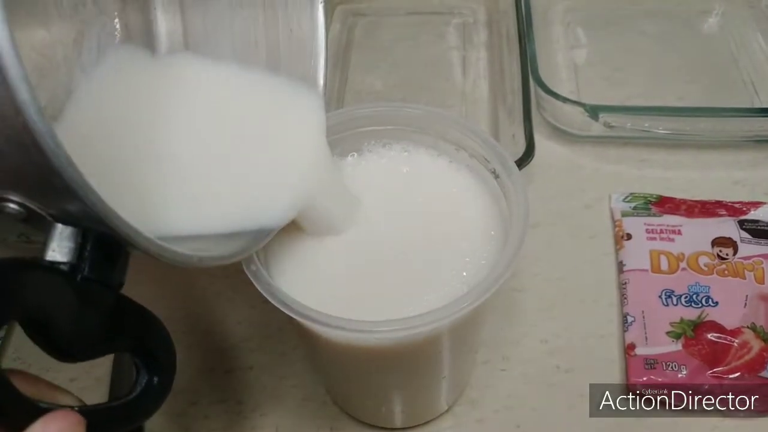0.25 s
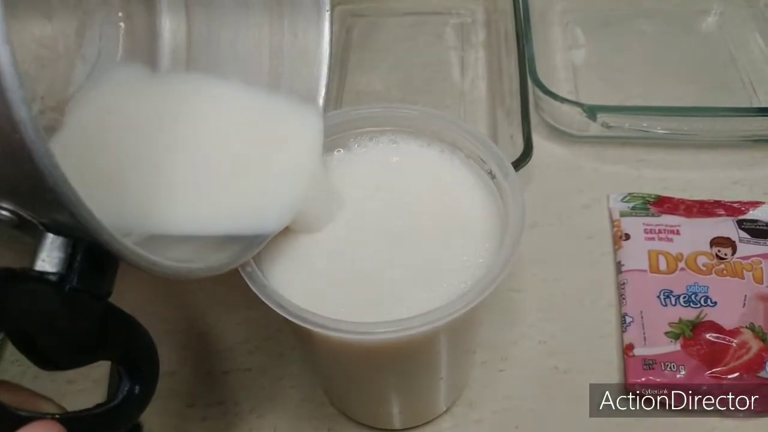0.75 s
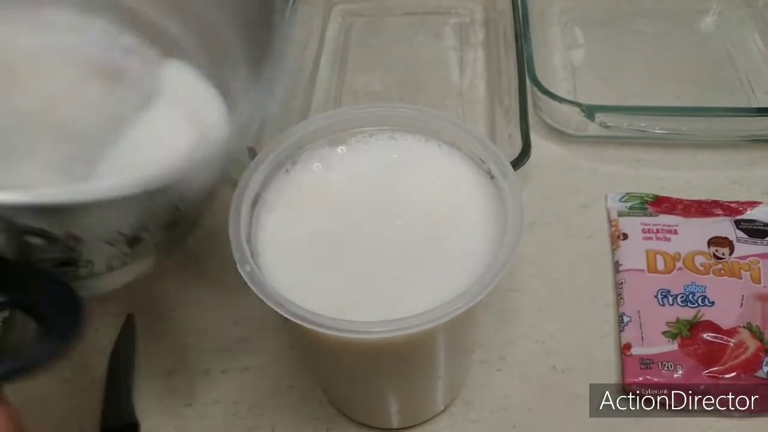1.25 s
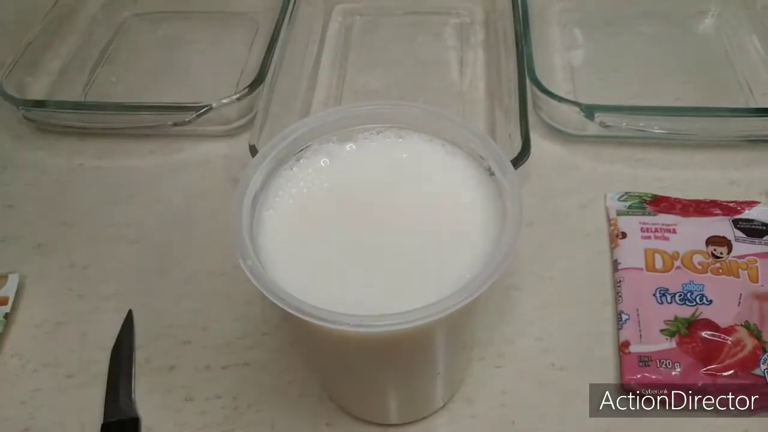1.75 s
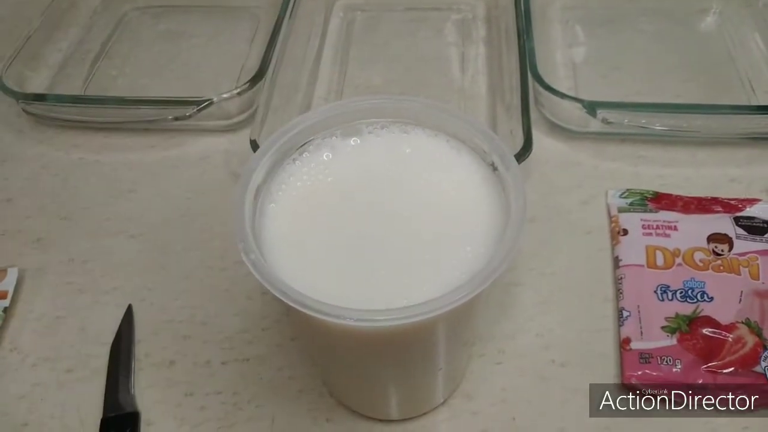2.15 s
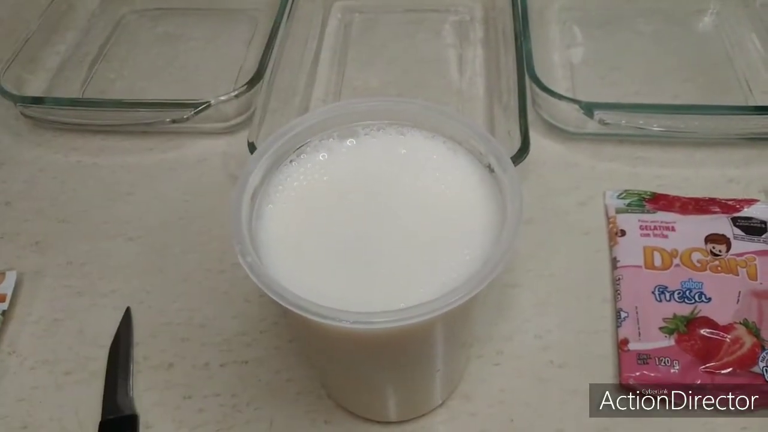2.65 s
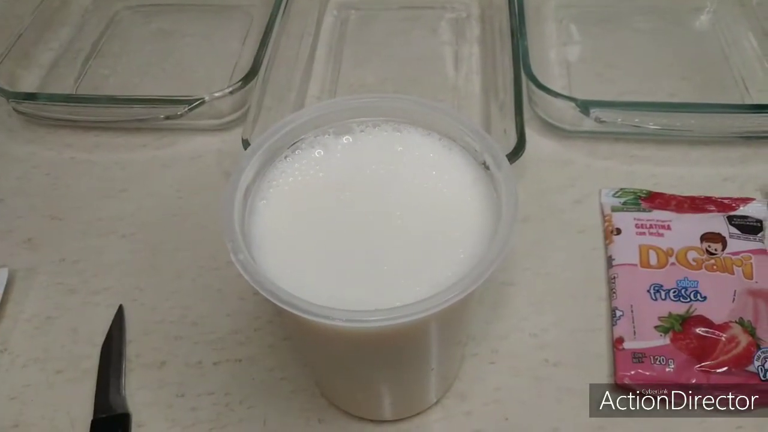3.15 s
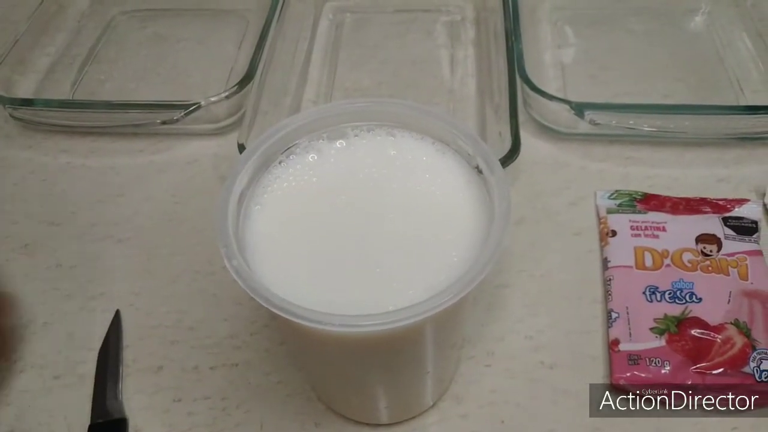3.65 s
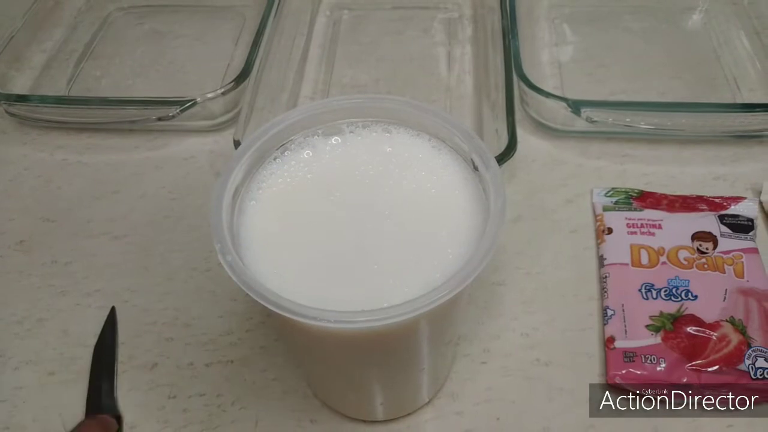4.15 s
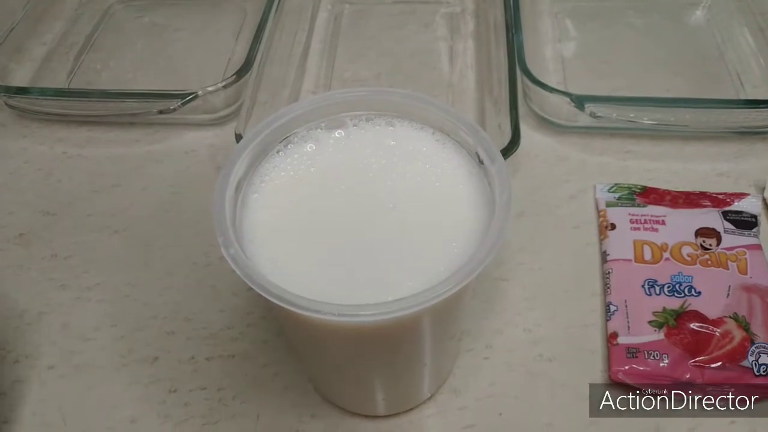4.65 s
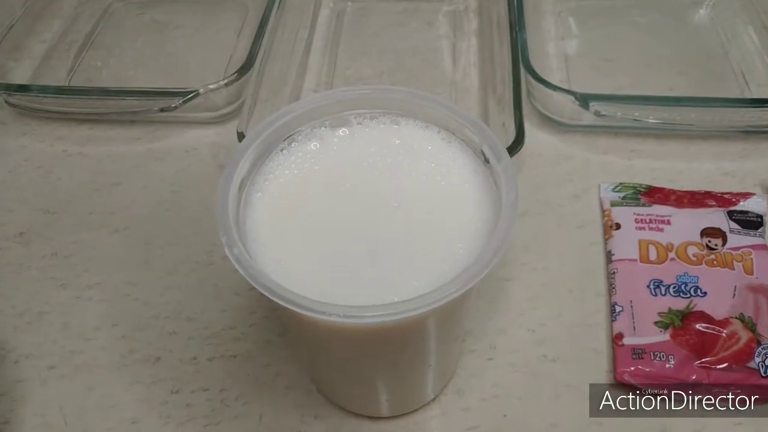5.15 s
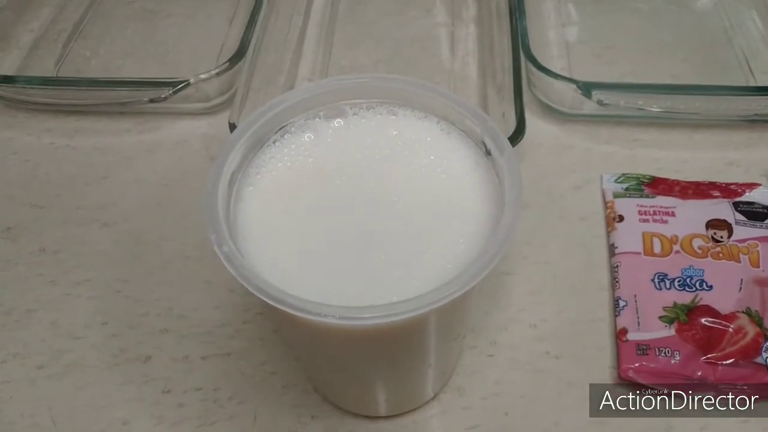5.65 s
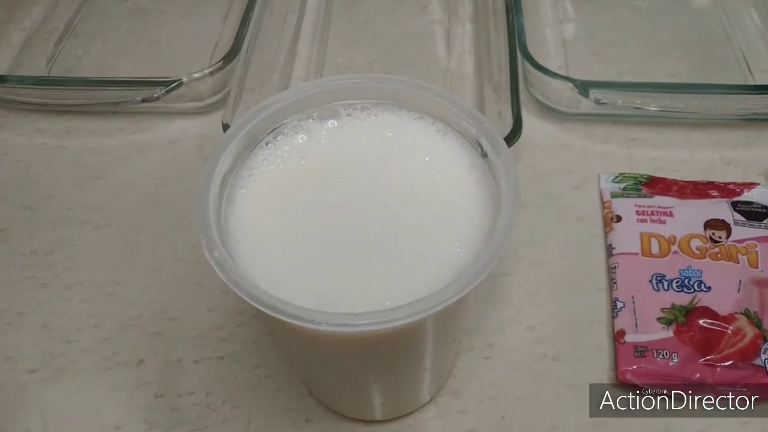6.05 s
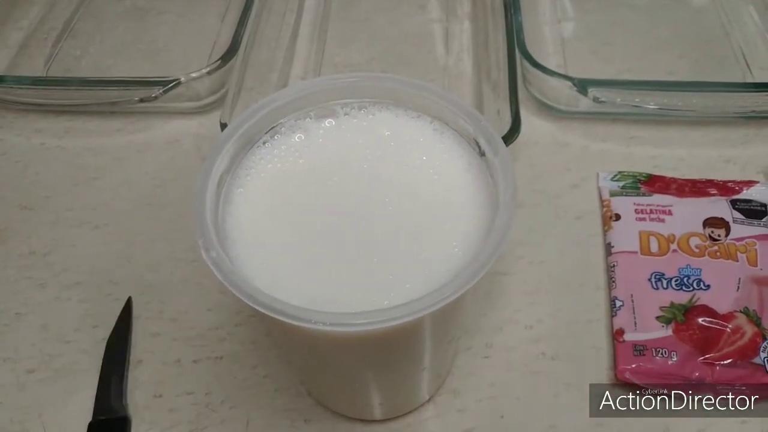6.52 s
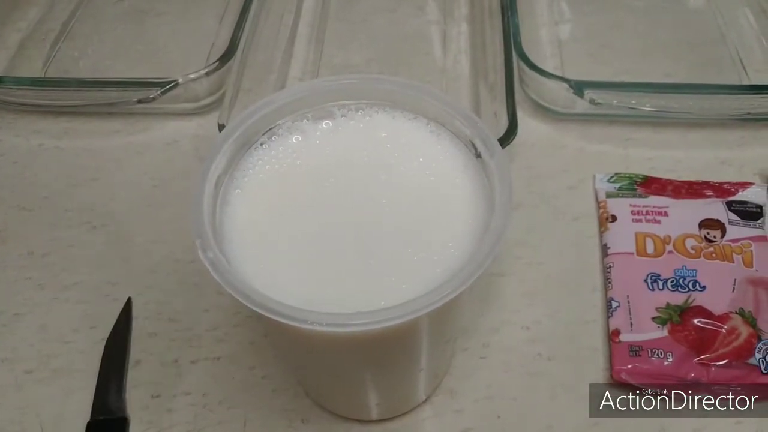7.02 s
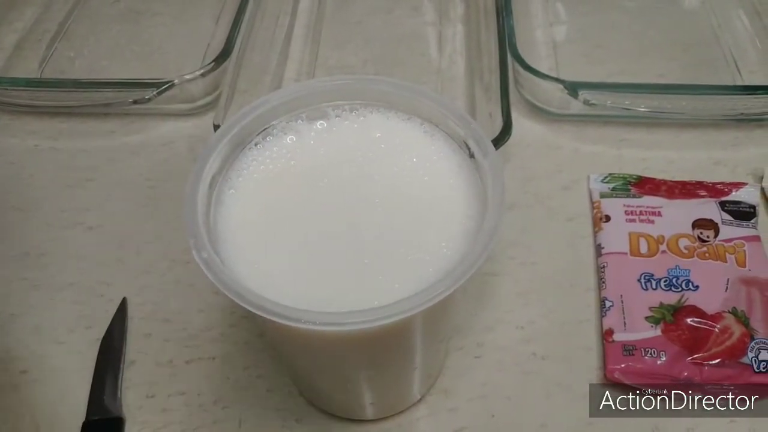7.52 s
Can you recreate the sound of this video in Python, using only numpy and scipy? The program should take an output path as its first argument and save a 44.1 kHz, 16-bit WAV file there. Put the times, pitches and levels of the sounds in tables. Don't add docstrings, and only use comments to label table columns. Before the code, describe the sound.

Close in a small live kitchen, a low fridge hum runs throughout. After a near-silent start come a soft liquid tone, a dull pot tap and a brief scrape, then the pot lands with a rocking metallic clunk. A foil packet crackles in sharp snaps, is cut with a quick rip, a knife clatters onto the counter, and lighter crinkling follows.

```python
import sys
import numpy as np
from scipy import signal
from scipy.fft import rfft, irfft
from scipy.io import wavfile
from scipy.ndimage import uniform_filter1d

SR = 44100
rng = np.random.default_rng(int(sys.argv[2]) if len(sys.argv) > 2 else 0)


def to_linear_factor(level_db):
    exponent = np.asarray(level_db, float) / 20
    return 10 ** exponent


def wav_out(sig):
    wavfile.write(sys.argv[1], SR, np.round(np.clip(np.atleast_2d(sig).T, -1, 1) * 32767).astype(np.int16))


N = 343098
T = np.arange(N) / SR

# from t/s, to t/s
OPEN_SPANS = [(.12, .135), (.495, .505), (.555, .565), (1.0, 1.16), (1.223, 1.279), (1.315, 1.566),
              (1.844, 1.975), (1.985, 2.003), (2.933, 3.405), (3.664, 4.127), (4.15, 4.8), (4.857, 4.9),
              (4.937, 5.055), (5.066, 5.09), (5.127, 5.143), (5.188, 6.15), (6.300, 6.628), (6.741, 6.915),
              (6.955, 7.028), (7.103, 7.290), (7.305, 7.318), (7.402, 7.480), (7.563, 7.8)]


def along(table, hz):
    return np.interp(np.log(hz + 1), np.log(np.array(table)[:, 0]), np.array(table)[:, 1])


def colour(x, table, size=2048):
    cepstrum = irfft(along(table, np.fft.rfftfreq(size, 1 / SR)) * np.log(10) / 20)
    cepstrum[1:size // 2] *= 2
    cepstrum[size // 2 + 1:] = 0
    return signal.oaconvolve(x, irfft(np.exp(rfft(cepstrum))))[:N]


def band(x, lo_hz, hi_hz, order=2):
    sections = signal.butter(order, [lo_hz, min(hi_hz, SR / 2.1)], "band", fs=SR, output="sos")
    return signal.sosfilt(sections, x)


def unit(x):
    return x / np.sqrt(np.mean(x ** 2))


def curve(table, col, t=T):
    rows = np.array(table)
    return np.interp(t, rows[:, 0], rows[:, col]), (t >= rows[0, 0]) & (t <= rows[-1, 0])


def swells(rows, t, tilt=0, size=32):
    s, db, rise, fall, last = np.array(rows).T[:, :, None]
    now = t[::size]
    below_peak_db = 10 * np.maximum((s - now) / rise, (now - s) / fall)
    power = to_linear_factor(2 * (db + tilt * last - below_peak_db)).sum(axis=0)
    return np.interp(t, now, np.sqrt(power))


def ring(x, modes):
    t = T[:SR // 2]
    answer = sum(to_linear_factor(db - 60 * t / t60) * np.sin(2 * np.pi * hz * t) for hz, db, t60 in modes)
    return signal.oaconvolve(x, answer)[:len(x)]


def grains(per_s, scatter_db, size=N):
    when, sign, luck = rng.random((3, size))
    size_steps = np.minimum(-np.log(luck + 1e-9), 3.0)
    return (when < per_s / SR) * np.sign(sign - .5) * to_linear_factor(scatter_db * size_steps)


def correlated(like, mid, side):
    return np.sqrt(1 + like) * mid + np.sqrt(1 - like) * side * np.array([[1], [-1]])


def fridge():
    # f/Hz, level/dB
    hum_lines = [(22, -52.5), (59.2, -49.5), (118.4, -67.5), (183.0, -72), (236.9, -67.5), (296.1, -68),
                 (570.6, -80.5), (710.6, -80), (3607, -105), (6923, -110)]
    # f/Hz, level/dB per Hz
    air_spectrum = [(4, 9.5), (16, 5.5), (30, 0.5), (50, -8.5), (100, -5), (150, -15.5), (280, -12),
                    (400, -16), (850, -29.5), (1150, -45), (1700, -45.5), (3500, -49.5), (5500, -58.5),
                    (7200, -54), (8400, -58.5), (15500, -59.5)]
    # f/Hz, likeness/1
    air_likeness = [(60, 0.44), (300, 0.58), (700, 0.87), (1400, 0.11)]
    air_db = -51
    hz = np.fft.rfftfreq(N, 1 / SR)
    like = np.clip(along(air_likeness, hz), 0, 1)
    mid, side = rfft(rng.standard_normal((2, N))) * to_linear_factor(along(air_spectrum, hz)) * (hz > 1)
    air = irfft(correlated(like, mid, side), N)
    skew = np.array([[.22], [-.22]])
    knots, hum = np.arange(N // 2000), 0
    for f, db in hum_lines:
        waver_db = 1.5 * np.interp(T * 9, knots, rng.standard_normal(len(knots)))
        hum = hum + to_linear_factor(db + waver_db) * np.sin(2 * np.pi * f * T + rng.uniform(0, 2 * np.pi) + skew)
    return to_linear_factor(air_db) * unit(air) + np.sqrt(2) * hum * to_linear_factor(np.array([[-.6], [.6]]))


def bumps(t60=0.044):
    # t/s, peak level/dB, f/Hz
    counter_bumps = [(3.885, -44, 700), (3.922, -35, 720), (4.037, -40, 81), (4.18, -42, 290),
                     (4.254, -40, 134), (4.295, -33, 81.6), (4.315, -40, 80.7), (5.364, -47, 80.7),
                     (5.631, -41, 226), (5.688, -38, 234), (6.304, -37, 560), (6.868, -50, 82.5),
                     (6.999, -45, 500), (7.2, -62, 80), (7.574, -39, 236), (7.663, -32, 110),
                     (7.756, -36.5, 82.4)]
    out, t = np.zeros(N + SR), T[:SR // 4]
    for s, db, hz in counter_bumps:
        out[int(s * SR):][:len(t)] += to_linear_factor(db - 1 - 60 * t / t60) * np.sin(2 * np.pi * hz * t)
    return out[:N]


def drag():
    # t/s, level/dB
    friction = [
        (1.84, -73),
        (1.848, -64),
        (1.874, -59),
        (1.936, -61),
        (2.002, -70),
        (2.01, -86),
    ]
    # f/Hz, level/dB, T60/s
    base_modes = [(360, 1.5, 0.057), (1950, -1, 0.014), (2350, 2, 0.012), (3330, 8, 0.011),
                  (4330, -12, 0.0093), (7150, -15, 0.0036)]
    (db, on), grit = curve(friction, 1), rng.standard_normal(N)
    return on * to_linear_factor(db - 0.5) * (unit(ring(grit, base_modes)) + 0.3 * band(grit, 1600, 10000))


def tap():
    # f/Hz, level/dB, T60/s
    filled_modes = [(596, 0, 0.07), (955, -12, 0.14), (1170, -24, .12), (1314, -22, 0.12),
                    (1500, -10, 0.07), (1884, -26, .1), (2223, -24, .1), (2353, -16, 0.06),
                    (2955, -28, 0.06), (3750, -18, .05), (4592, -16, .06), (5530, -18, .04)]
    tap_s, peak_db, rebound_s = 1.326, -33, .024
    push = np.zeros(N)
    push[int(tap_s * SR):][:12] = np.hanning(12)
    push[int((tap_s + rebound_s) * SR):][:6] = to_linear_factor(-9.0) * np.hanning(6)
    knock = band(ring(push, filled_modes), 520, 7000)
    return to_linear_factor(peak_db) * knock / np.abs(knock).max()


def sing():
    # t/s, f/Hz, level/dB
    glide = [
        (.99, 370, -66),
        (1.03, 397, -56),
        (1.14, 405, -62),
        (1.234, 362, -57),
        (1.27, 347, -73),
    ]
    hz, on = curve(glide, 1)
    wobble, drift = (unit(uniform_filter1d(rng.standard_normal(N), 400)) for _ in range(2))
    phase = 2 * np.pi * np.cumsum(hz * (1 + .012 * drift)) / SR
    tone = (1 + 0.55 * wobble) * np.sin(phase)
    splash = swells([(1.255, -66, .05, .03, 0)], T) * unit(band(grains(700, 3.1), 480, 900))
    return on * np.sqrt(2) * to_linear_factor(curve(glide, 2)[0] - 1.5) * tone + splash


def dropped(blows, rattle, modes, push_s, ring_db, rumble_db, size=512):
    out, start = np.zeros(N), int(min(blows[0][0], rattle[0][0]) * SR)
    push, crack, t = np.zeros(SR), np.zeros(SR), T[:size]
    for (s, db, crack_db), noise in zip(blows, rng.standard_normal((len(blows), size))):
        at = int(s * SR) - start
        push[at:][:size] += to_linear_factor(db) * unit(t * np.exp(-t / push_s)) * np.sqrt(1 / size)
        crack[at:][:size] += to_linear_factor(db + crack_db) * noise * np.exp(-t / .0015)
    chatter, now = unit(grains(900, 2.45, size=SR)), T[start:start + SR]

    def rung(x):
        return band(ring(x, modes), 150, 16000)

    body = unit(rung(chatter)) * to_linear_factor(ring_db) + unit(band(chatter, 165, 1905)) * to_linear_factor(rumble_db)
    treble = unit(band(chatter, 1600, 7000, order=1)) * to_linear_factor(-4.5)
    shudder = swells(rattle, now) * body + swells(rattle, now, 1) * treble
    struck = rung(push + 0.47 * crack) * to_linear_factor(-27)
    out[start:start + SR] = struck + band(crack, 2200, 11000) + shudder
    return out


def pot():
    # t/s, peak level/dB, crack minus peak level/dB
    pot_blows = [
        (2.937, -22, -22),
        (2.943, -11, -16.5),
        (2.954, -16.5, -21.5),
        (3.136, -19, -24),
        (3.1625, -13, -21),
        (3.256, -20, -30),
        (3.284, -24.5, -13),
    ]
    # peak t/s, level/dB, swell t/s per 10 dB, fade t/s per 10 dB, treble minus level/dB
    pot_rattle = [
        (2.944, -27, .003, .055, 0),
        (2.995, -23, .06, .05, -10),
        (3.164, -26, .002, .055, -21),
        (3.24, -41, .004, .07, -1),
        (3.287, -35, .12, .04, -11),
    ]
    # f/Hz, level/dB, T60/s
    pot_modes = [(62.1, -1, 0.25), (173, -3, 0.1), (218, 5, 0.075), (290, -3, .07), (365, -3, 0.093),
                 (515, -3.5, .15), (640, -2, .12), (782, -8, 0.12), (846, -3, 0.1), (1027, -14.5, 0.2),
                 (1531, -18.5, .3), (2020, -24, .08)]
    return dropped(pot_blows, pot_rattle, pot_modes, push_s=.0003, ring_db=-12, rumble_db=-7)


def buzz():
    # peak t/s, level/dB, swell t/s per 10 dB, fade t/s per 10 dB, tilt level/dB
    chatters = [
        (2.948, -41, .002, .04, 0),
        (2.99, -41, .03, .02, 0),
        (3.245, -52, .006, .04, 0),
        (3.292, -47, .02, .015, 0),
    ]
    # f/Hz, level/dB, T60/s
    handle_modes = [(2330, -3, .04), (2480, -4, .05), (3280, -3, .03), (4110, -1, .03), (5500, -10, .03)]
    out, start = np.zeros(N), int((chatters[0][0] - .02) * SR)
    handle = unit(ring(grains(800, 2.5, size=SR), handle_modes))
    out[start:start + SR] = swells(chatters, T[start:start + SR]) * handle
    return out


def knife():
    # t/s, peak level/dB, crack minus peak level/dB
    knife_blows = [
        (6.304, -26, -15),
        (6.374, -12, -6),
        (6.378, -10, -13),
        (6.409, -24, -11),
        (6.44, -19, -21),
        (6.463, -17.5, -15),
    ]
    # peak t/s, level/dB, swell t/s per 10 dB, fade t/s per 10 dB, treble minus level/dB
    knife_rattle = [
        (6.302, -43, .002, .06, -2),
        (6.38, -21, .004, .04, -13.5),
        (6.472, -30, .1, .04, -21),
        (6.55, -44, .05, .1, -30),
    ]
    # f/Hz, level/dB, T60/s
    knife_modes = [(63, -6, .15), (226, -11, 0.13), (374, -6.5, 0.084), (605, -8.5, 0.098),
                   (711, -2.5, 0.07), (862, 0.5, .06), (1018, 2.5, 0.046), (1170, -4.5, 0.18),
                   (1552, 0, 0.062), (1771, 0.5, .17), (1850, -3.5, 0.055), (2487, -18, .08),
                   (4517, 4, 0.012)]
    return dropped(knife_blows, knife_rattle, knife_modes, push_s=.0001, ring_db=-16.5, rumble_db=-5.5)


def rip():
    # t/s, level/dB
    tear = [
        (5.664, -44.5),
        (5.672, -28),
        (5.69, -26),
        (5.7, -42.5),
        (5.72, -46),
    ]
    db, on = curve(tear, 1)
    return on * to_linear_factor(db) * unit(band(grains(6000, 2.8), 2800, 17000, order=1))


def rustle(count):
    # peak t/s, level/dB, swell t/s per 10 dB, fade t/s per 10 dB, crispness level/dB
    shifts = [
        (1.016, -82, .02, .15, -3),
        (1.262, -68, .035, .012, -6),
        (1.316, -66, .003, .008, 4),
        (1.325, -63, .006, .06, -18),
        (1.486, -58.5, .12, .13, -3),
    ]
    # peak t/s, level/dB, swell t/s per 10 dB, fade t/s per 10
    # dB, crispness level/dB
    sachet_moves = [(3.68, -54, .01, .1, -8), (3.74, -49, .03, .06, 3), (3.925, -46, .1, .09, -7),
                    (4.035, -48, .035, .035, -11), (4.19, -60, .015, .1, -10), (4.3, -56, .08, .08, -14),
                    (4.53, -51, .25, .03, -1), (4.626, -48.5, .012, .13, -7), (4.94, -65, .004, .1, -14),
                    (4.982, -57, .005, .055, -2), (5.323, -55, .12, .04, -2), (5.342, -41, .008, .045, -6),
                    (5.5, -57, .008, .1, -1), (5.555, -50, .04, .04, 0), (5.661, -34, .026, .11, -5),
                    (5.825, -50, .05, .03, -10), (5.917, -40, .006, .016, -3), (5.96, -57, .03, .2, 0),
                    (6.11, -61, .1, .02, 0),
                    (6.746, -60, .008, .09, -4),
        (6.872, -54, .08, .02, -5),
        (6.976, -57, .02, .06, -8),
        (7.106, -57, .01, .14, -3),
        (7.186, -50, .022, .055, -6),
        (7.41, -64, .008, .1, -1),
        (7.46, -59, .03, .015, -3),
        (7.568, -55, .006, .17, -5),
        (7.666, -33.5, .004, .012, -1),
        (7.78, -52, .025, .05, -2),
    ]
    hand_db, hand_per_crisp = -9, -1.3
    wander_db, wander_per_s = 2.5, 14
    slips = np.array([unit(grains(400, 4.4)) + 0.55 * rng.standard_normal(N) for _ in range(count)])
    moves = shifts + sachet_moves
    moving = sum((T > a) & (T < b) for a, b in OPEN_SPANS)
    mid, sheen = swells(moves, T), swells(moves, T, 1)
    hand = to_linear_factor(hand_db) * swells(moves, T, hand_per_crisp)
    limp = to_linear_factor(-8.5) * swells(moves, T, -.9)
    steps = np.arange(N // 1000) / wander_per_s

    def bend():
        wander = [np.interp(T[::64], steps, rng.standard_normal(len(steps))) for _ in slips]
        return to_linear_factor(wander_db * np.array(wander)).repeat(64, axis=1)[:, :N]

    body = to_linear_factor(-6) * hand * unit(band(slips, 510, 1070))
    body -= limp * bend() * unit(band(slips, 1500, 2600))
    body += to_linear_factor(-2.5) * mid * bend() * unit(band(slips, 2600, 4900))
    body -= to_linear_factor(5.5) * sheen * bend() * unit(band(slips, 5600, 13000))
    return to_linear_factor(-12.5) * moving * body


def snaps(size=2048):
    # t/s, peak level/dB, centre f/Hz, left minus right
    # level/dB
    creases = [(3.6871, -41, 1890, -7), (3.733, -18.5, 2500, 3), (3.8626, -36, 2670, -5),
               (3.9201, -17.5, 6800, 1), (3.922, -26, 1000, 0), (4.0395, -32.5, 2690, 2),
               (4.0786, -34, 2260, -5), (4.179, -33, 4330, -10.5), (4.2407, -37, 1770, 3),
               (4.3195, -26, 2000, 0), (4.3979, -39, 6070, -3), (4.432, -36, 2870, 1),
               (4.5025, -27, 7500, 3), (4.5955, -21, 3500, 3), (4.9762, -30, 6460, -5),
               (5.1893, -27, 7650, 2.5), (5.3372, -18, 7360, 3), (5.3683, -19, 6100, 1),
                (5.602, -27, 3180, 3), (5.6194, -30, 6200, -17), (5.6305, -17, 3260, 4),
                (5.6423, -18.5, 3520, -9), (5.6574, -16, 7380, -.5), (5.7982, -24, 5120, -2),
                (5.9171, -18, 7440, 6), (6.008, -27, 7350, 4), (6.067, -28, 4180, 3.5),
                (6.1035, -32, 4650, 0),
               (6.834, -33.5, 6080, -4), (6.8557, -33.5, 2510, -9), (6.9652, -41.5, 6600, -3),
              (7.1053, -31, 7260, 5), (7.1813, -26, 3430, -10), (7.1989, -30, 1760, 10.5),
              (7.4219, -42, 1870, -10), (7.451, -43, 2430, -12), (7.5725, -38, 2250, -5.5),
              (7.6275, -35, 6600, -14), (7.6457, -39, 1730, -9), (7.6574, -35, 3620, 1),
              (7.6666, -17.5, 8100, -24.5), (7.67, -32, 1850, -6), (7.68, -22, 7800, -14),
              (7.6904, -20, 7440, -17), (7.7325, -27, 7800, -22), (7.7545, -23, 10000, -16)]
    # t/s, peak level/dB
    ticks = [(.1248, -62), (.4994, -59), (.5594, -59), (1.024, -65), (1.0694, -64), (4.864, -65),
             (4.8833, -57.5), (5.0759, -58), (5.1334, -55), (7.308, -71)]
    # t/s, peak level/dB, centre f/Hz, t/ms, left minus right level/dB
    runs = [(3.722, -38, 6000, 3, 0), (3.924, -30, 7400, 8, 2), (4.221, -44, 7400, 2, 0),
            (4.294, -42, 7500, 5, 0), (4.504, -30, 7400, 7, 3), (4.612, -38, 2600, 3, 0),
            (4.717, -40, 6500, 2, 0), (4.737, -41, 3500, 3, 0), (5.252, -45, 7500, 3, 2),
            (5.341, -30, 5000, 5, 3), (5.371, -32, 7400, 5, 2), (5.4965, -43, 7140, 4, 2.5),
            (5.758, -36, 4500, 2, 0), (5.921, -28, 4200, 4, 4), (6.216, -62, 6000, 1, 0),
            (6.364, -33, 9000, 3, 0), (6.3785, -12, 4600, 2.5, 0), (6.441, -20, 2500, 4, 0),
            (6.465, -30, 3800, 5, 0), (6.49, -28, 4500, 2, 0)]
    snap_ms, tick_hz = .7, 1750
    thud_db, thud_share, thud_db_per_octave = -46, .3, -5
    out, t = np.zeros((2, N + size)), T[:size]
    rows = [(s, db, hz, snap_ms, pan) for s, db, hz, pan in creases]
    rows += [(s, db, tick_hz, snap_ms, 0) for s, db in ticks] + runs
    for (s, db, hz, ms, pan_db), noise in zip(rows, rng.standard_normal((len(rows), size))):
        burst = (noise + 2.5 * (t == 0)) * np.exp(-t * 1000 / ms)
        crack = band(burst, hz * 0.85, hz * 1.25, order=1) + 0.55 * band(burst, 1800, 17000)
        thud = band(noise * np.exp(-t / 0.009), 200, 1800)
        low_db = thud_db + thud_share * (db + 30) + thud_db_per_octave * np.log2(hz / 2000) - db
        one = crack / np.abs(crack).max() + to_linear_factor(np.minimum(low_db, -6)) * thud / np.abs(thud).max()
        level_db = db + np.array([[pan_db], [-pan_db]]) / 2
        out[:, int((s + .0008) * SR):][:, :size] += to_linear_factor(level_db) * one
    return out[:, :N]


def room(x, lag, early_db, late_db, early_t60=0.034):
    # f/Hz, T60/s
    room_t60 = [(100, 0.5), (500, 0.43), (1500, 0.23), (4000, 0.42), (10000, 0.068)]
    # f/Hz, likeness/1
    wall_likeness = [(100, 0.85), (250, 1), (600, 0.14), (1200, .01)]
    x, t, tail = x * np.ones((2, 1)), T[:SR // 3], 0
    early = to_linear_factor(early_db) * unit(to_linear_factor(-60 * t / early_t60))
    for hz in 63 * 2. ** np.arange(9):
        like = np.clip(along(wall_likeness, hz), 0, 1)
        mid, side = band(rng.standard_normal((2, len(t))), hz / np.sqrt(2), hz * np.sqrt(2))
        late = to_linear_factor(late_db) * unit(to_linear_factor(-60 * t / along(room_t60, hz)))
        tail = tail + correlated(like, mid, side) * (early + late)
    wet = signal.oaconvolve(x.mean(axis=0)[None], tail / np.sqrt(2 * len(t)), axes=1)[:, :N]
    return wet + np.array([np.roll(x[0], lag), x[1]])


def suppress(x, shut_db, edge_hz, slew_s, linger_s=0.042):
    is_open = sum(np.clip(np.minimum(T - a, b - T) / slew_s + .5, 0, 1) for a, b in OPEN_SPANS)
    low = signal.sosfiltfilt(signal.butter(2, edge_hz, fs=SR, output="sos"), x)
    middle = signal.sosfiltfilt(signal.butter(2, 2200, fs=SR, output="sos"), x) - low
    share = 1 / (linger_s * SR)
    lingering = signal.lfilter([share], [1, share - 1], is_open)
    gain = to_linear_factor(shut_db * (1 - np.clip([np.maximum(is_open, lingering), is_open], 0, 1)))
    return low + middle * gain[0] + (x - low - middle) * gain[1]


def scene():
    lags = 19, 28, 41, -3
    # f/Hz, level/dB
    left_port = [(1000, 1.5), (2500, 0), (6000, 2), (7400, 4), (8600, -5), (10300, -31), (12500, -23.5),
                 (15000, -24)]
    right_port = [(1000, 1.5), (2500, 0.5), (6000, -0.5), (7400, -10.5), (8600, -10), (11000, 1),
                  (13000, -10.5), (15000, -17)]
    heard = room(to_linear_factor(1.5) * snaps(), lags[0], early_db=-6.5, late_db=-7)
    heard += room(to_linear_factor(3.5) * (drag() + rip()), lags[1], early_db=-2.5, late_db=-10)
    for part, lag in zip(rustle(count=3), lags):
        heard += room(part, lag, early_db=4, late_db=-8)
    for lag in lags[0], lags[3]:
        heard += room(to_linear_factor(-4.2) * (pot() + knife() + buzz()), lag, early_db=1.5, late_db=-4)
    heard += room(tap() + sing() + bumps(), lags[0], early_db=-6, late_db=-12)
    ports = np.array([colour(heard[0], left_port), colour(heard[1], right_port)])
    return suppress(ports, shut_db=-32, edge_hz=870, slew_s=0.014) + fridge()


def top_cut(x):
    return signal.sosfilt(signal.butter(12, 16480, fs=SR, output="sos"), x)


def record(dry):
    mix = signal.sosfilt(signal.ellip(8, .2, 26, 15380, fs=SR, output="sos"), dry)
    return top_cut(mix)


dry = scene()
out = record(dry)
wav_out(out)
```